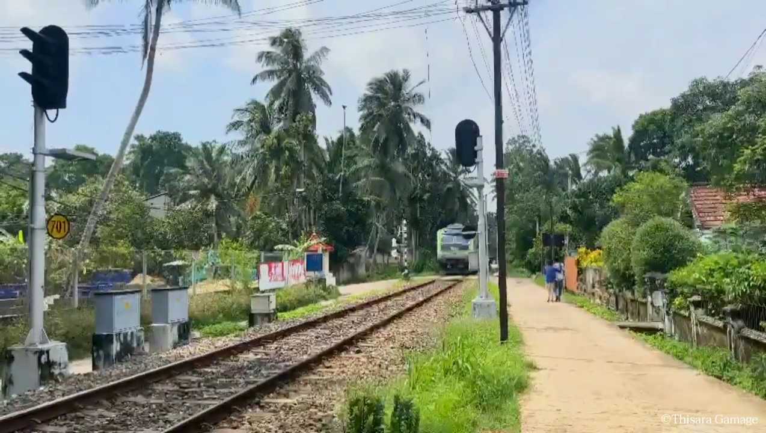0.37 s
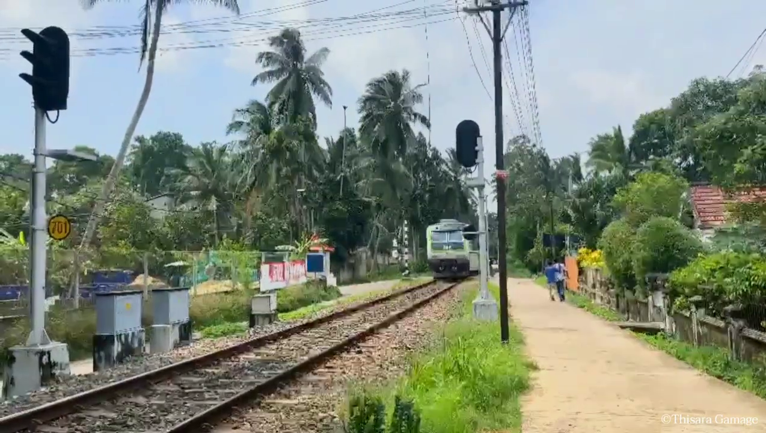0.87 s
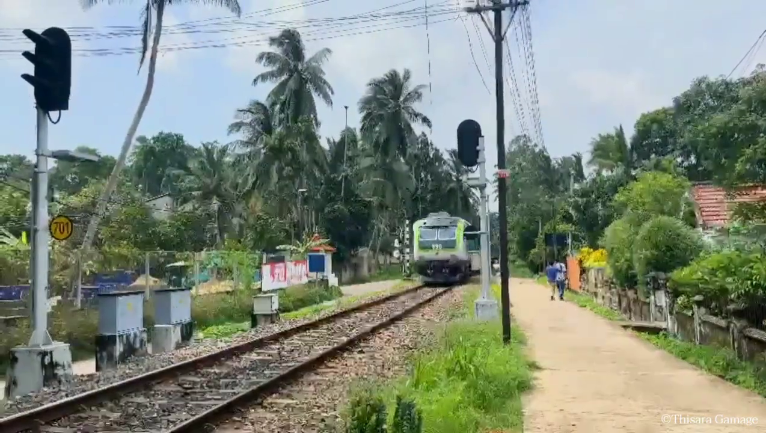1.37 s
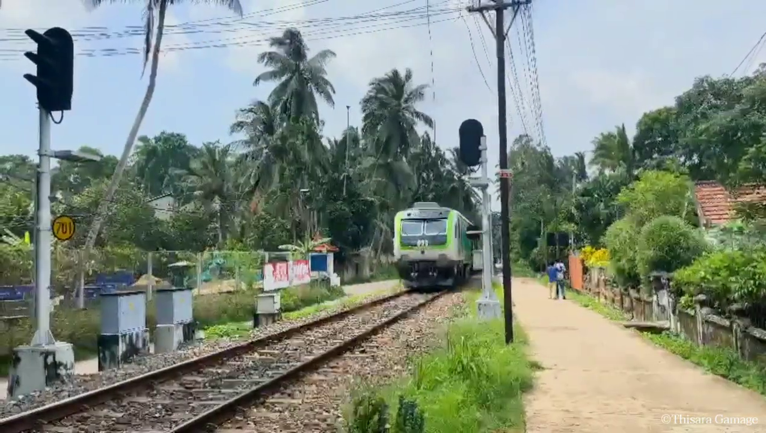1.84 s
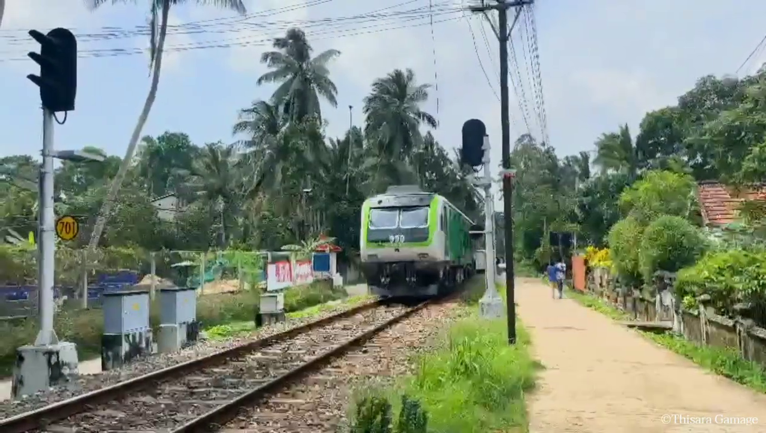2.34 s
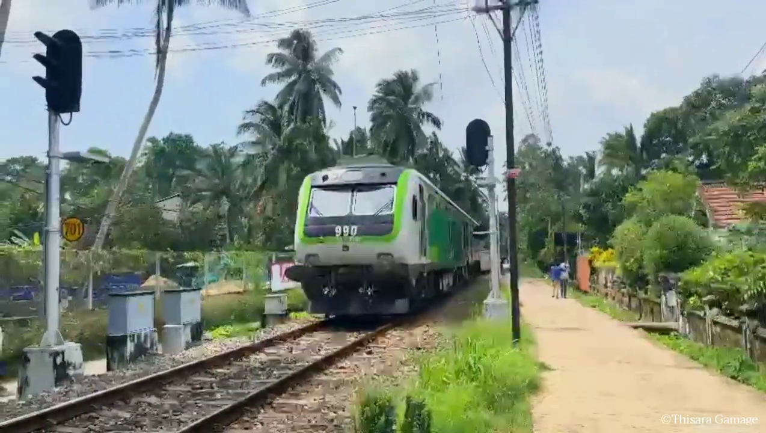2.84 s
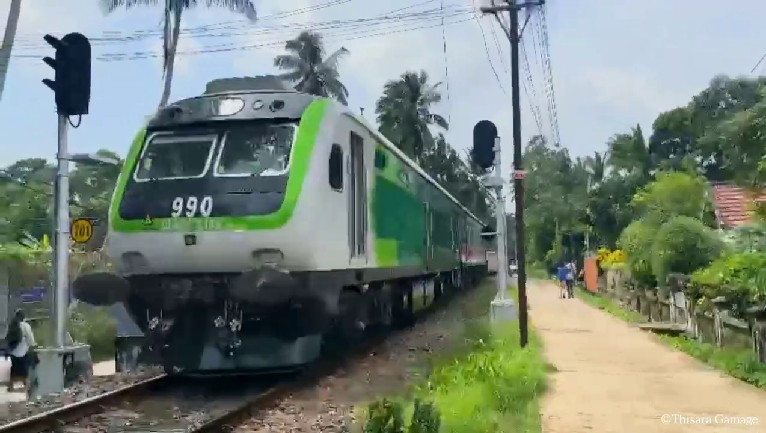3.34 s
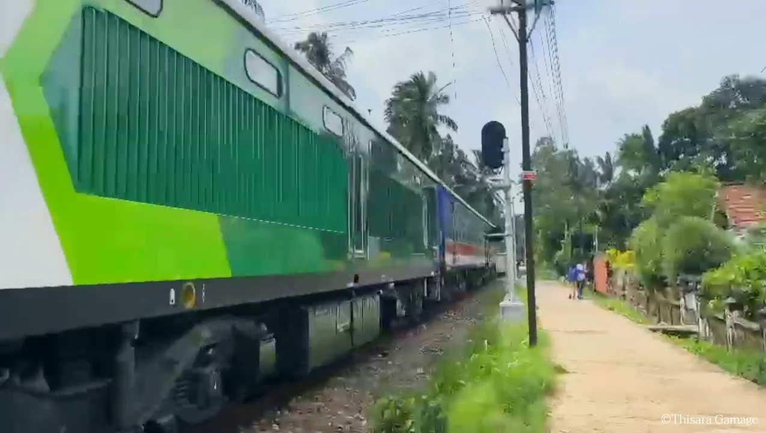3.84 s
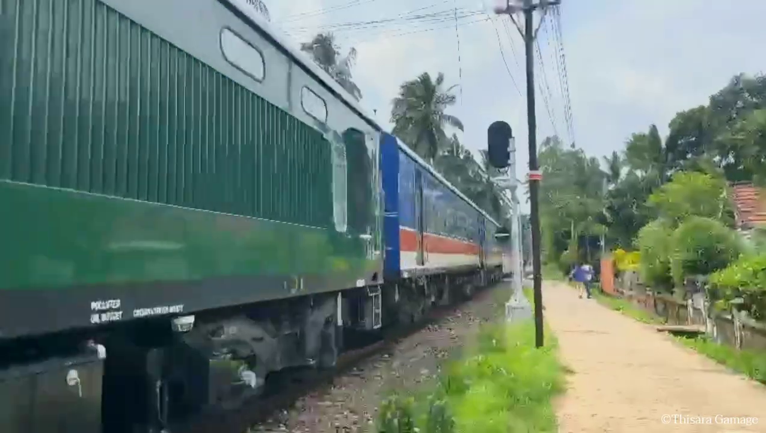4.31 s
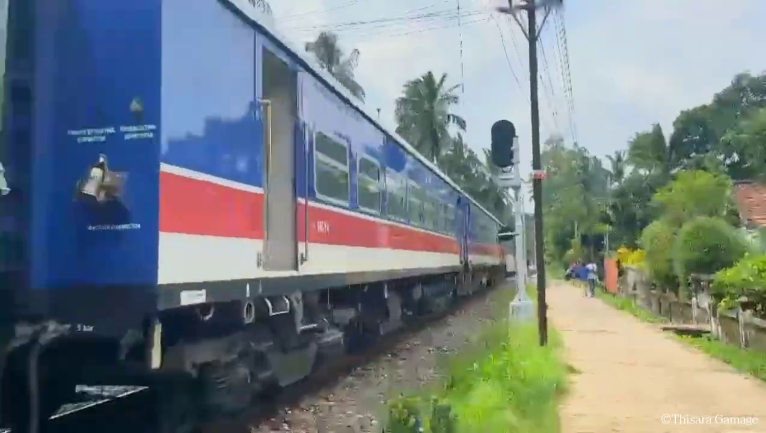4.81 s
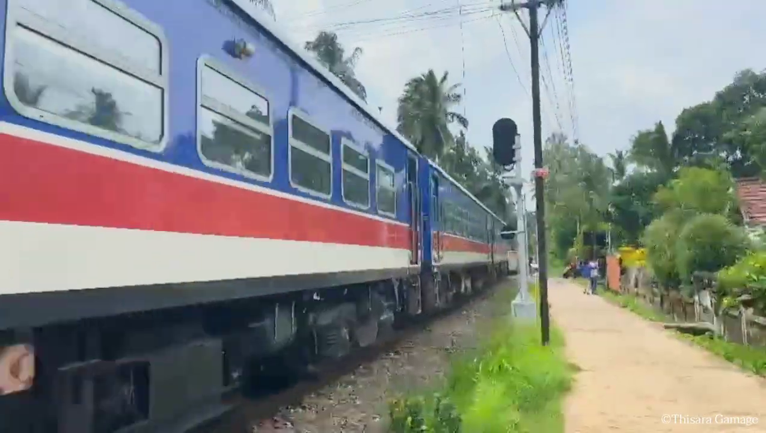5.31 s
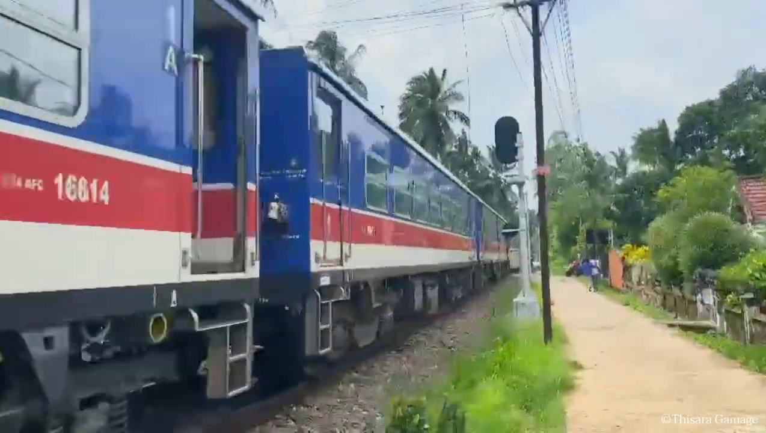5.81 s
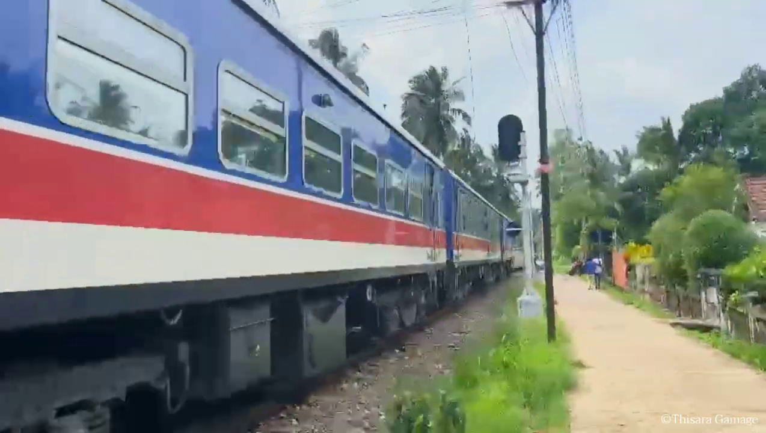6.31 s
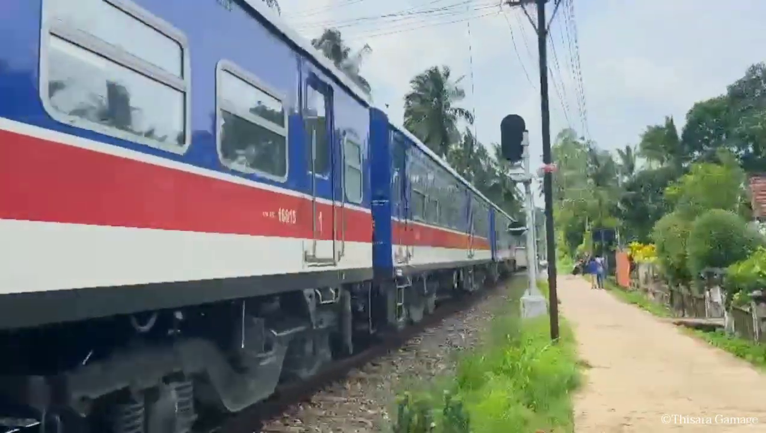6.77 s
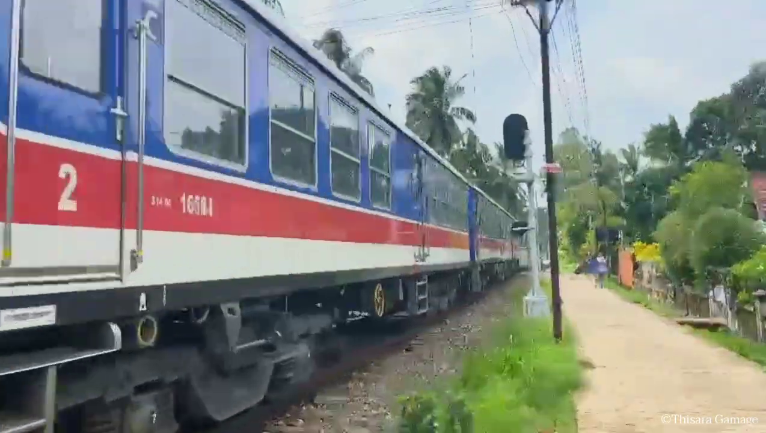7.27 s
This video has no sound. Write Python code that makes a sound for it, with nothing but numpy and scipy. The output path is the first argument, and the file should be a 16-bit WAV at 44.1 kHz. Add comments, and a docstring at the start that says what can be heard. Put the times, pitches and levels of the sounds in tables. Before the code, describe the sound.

Outdoors beside a railway, a diesel locomotive approaches with a low throbbing hum and growing breathy roar. Around three seconds its wheels hit the near rail with hard knocks and steel clatter. The roar peaks close by, a fuzzy whir sliding down in pitch, then falls away while coaches roll past with rumble, hiss and regular paired knocks. Stereo microphone a few metres from the track.

```python
"""Trackside, a few metres from the rails: a diesel train comes up the line, passes, and its coaches roll by.
Sine tones make the engine's firing orders, a second hum and a drone; shaped noise makes the roar, whose
bands drop in pitch as it passes, the rumble and hiss of the wheels and a fuzzy whir.
Wheels knock over the rail joints as noise through resonances, the track bed thuds and loose parts clatter.
Faint thumps and a thin whistle lie behind; a two-port microphone hears it all."""
import sys
import numpy as np
from scipy import signal
from scipy.fft import rfft, irfft
from scipy.io import wavfile
from scipy.ndimage import uniform_filter1d, minimum_filter1d

SR = 44100
rng = np.random.default_rng(int(sys.argv[2]) if len(sys.argv) > 2 else 0)


def transcribe(signal):
    """Save signal, clipped to [-1, 1], as a 16-bit WAV file at the path in sys.argv[1]."""
    frames = np.atleast_2d(signal).T
    limited = np.clip(frames, -1, 1)
    pcm = np.round(limited * 32767).astype(np.int16)
    wavfile.write(sys.argv[1], SR, pcm)


def linear_from_db(decibels):
    """Turn decibels (scalar or array-like) into linear amplitude factors; 0 gives 1."""
    return 10 ** (np.asarray(decibels, float) / 20)


N = 326340

SPEED_M_S, TRACK_M, SOUND_M_S = 12.6, 4.63, 343
ENGINE_S, ROAR_S = 4.44, 4.233  # the exhaust and the engine room are abreast


def evened(x):
    """Scales to rms 1."""
    return x / np.sqrt(np.mean(x ** 2) + 1e-20)


def smooth_noise(shape, size):
    """Random values averaged along the first axis, rms 1."""
    return evened(uniform_filter1d(rng.standard_normal(shape), size=size, axis=0))


def curves(rows, t):
    """Columns of a table read at the times t."""
    s, *columns = np.transpose(rows)
    return [np.interp(t, s, c) for c in columns]


def read(points, hz):
    """A spectrum read on a log-frequency axis."""
    f, value = np.transpose(points)
    return np.interp(np.log(hz + 1), np.log(f + 1), value)


def bump(hz, centre, width):
    """A rounded peak of height 1 that halves at one width from its centre."""
    return 1 / (1 + ((hz - centre) / width) ** 2)


def waver(hz):
    """Irregular drift of rms 1: twelve sines of random phase, the fastest at hz."""
    t = np.arange(N) / SR
    rates = np.geomspace(hz / 10, hz, num=12)
    return evened(sum(np.sin(2 * np.pi * (f * t + rng.random())) / np.sqrt(f) for f in rates))


def tone(hz, db, wobble_hz, flutter_db):
    """A sine of rms level db with slight unsteadiness."""
    turns = np.cumsum(hz + wobble_hz * waver(6.9)) / SR + rng.random()
    return np.sqrt(2) * linear_from_db(db + flutter_db * waver(12)) * np.sin(2 * np.pi * turns)


def ring(x, modes):
    """Sum of resonances, each applied twice for dark valleys."""
    hz = np.fft.rfftfreq(x.shape[-1], 1 / SR)
    gain = sum(linear_from_db(db) / (1 + 1j * (hz - f) / width) ** 2 for f, width, db in modes)
    return irfft(rfft(x) * gain, x.shape[-1])


def burst(t, rise, length):
    """Quick rise, short plateau, rounded end."""
    return (1 - np.exp(-t / rise)) * np.exp(-(t / max(length, .01)) ** 2)


def struck(sound, envelope):
    """Shapes a ringing noise by an envelope, with just the energy that the envelope holds."""
    return evened(sound * envelope) * np.sqrt(np.mean(envelope ** 2))


def add(mix, s, sound):
    """Mixes a two-port sound in at time s."""
    part = mix[:, round(s * SR):][:, :sound.shape[1]]
    part += sound[:, :part.shape[1]]


def doppler(t, abreast_s):
    """Pitch factor of a source on the train: high as it comes, low as it goes."""
    along = SPEED_M_S * (abreast_s - t)
    return 1 / (1 - SPEED_M_S / SOUND_M_S * along / np.hypot(along, TRACK_M))


def nearness(t, abreast_s, closest_m):
    """Power against the closest point, by the inverse square of distance."""
    return 1 / (1 + (SPEED_M_S * (t - abreast_s) / closest_m) ** 2)


def shape(db, hz, low_hz, high_hz):
    """Spectrum whose band low-high carries power 1."""
    gain = linear_from_db(db)
    band = (hz > low_hz) & (hz < high_hz)
    return gain / np.sqrt((gain ** 2 * band).sum(axis=0))


# direction of the loudest part: t/s, lag of the left port/samples,
# how closely the sound gathers there (factor on the likeness above 400 Hz)
LAG = [(0, 3.5, 0.48), (1.3, 2.5, 0.65), (1.9, 10.5, 1.6), (2.7, 15.5, 1.1), (2.97, 13, 1),
       (3.07, -10, 0.99), (3.4, -12.5, 1), (3.7, -9, 1.1), (3.95, -8.5, 1.25), (4.3, -14, 1.57),
       (4.6, -17.5, 1.38), (5.2, -17, 0.59), (5.6, -17.5, 0.93), (6.3, -16, 0.57), (6.7, -16.5, 1.35),
       (7.4, -15, 1.34)]
# likeness of the ports: f/Hz, left-right likeness (negative = opposed)
LIKENESS = [(60, 1), (130, 0.85), (300, 0.7), (500, 0.29), (800, 0.36), (1100, 0.5), (1450, 0.59),
            (2000, 0.26), (2500, 0.0032), (3100, 0.081), (5900, -0.074), (6500, -0.31), (7100, 0.049),
            (7800, -0.061), (8600, 0.43), (10600, 0.54), (11000, -0.67), (11400, 0.044)]
# balance of the ports: f/Hz, left over right/dB
TILT = [(60, -2), (140, -1), (340, -1.5), (830, 1), (1980, 0.5), (4200, 4.5), (5800, 4), (6500, 0.5),
        (7200, 5), (9000, -1), (11400, 0)]
# the casing stretches the lag: f/Hz, share of the lag
BEND = [(340, 0.89), (520, 1.12), (700, 1.1), (900, 1.05), (1400, 0.97), (1800, 0.85), (2100, 1.02),
        (2500, 1.13)]
LAG_TOP_HZ = 3100  # above this the lag is not applied


def ports(magnitude, size, patchy_db):
    """Random short-time spectra at two ports: partly alike, the left one lagging by the direction of the train."""
    t = np.arange(N * 4 // size + 5) * size / 4 / SR
    hz = np.fft.rfftfreq(size, 1 / SR)[:, None]
    a, b, c, d, patches = rng.standard_normal((len(t), len(hz), 5)).T
    patches = evened(uniform_filter1d(uniform_filter1d(patches, size=9, axis=0), size=9, axis=1))
    lag, gathering = curves(LAG, t)
    same = np.clip(read(LIKENESS, hz) * gathering ** (hz > 400), -.97, .995)
    right, own = a + 1j * b, c + 1j * d
    delay_s = read(BEND, hz) * lag / SR * (hz < LAG_TOP_HZ)
    left = same * right * np.exp(-2j * np.pi * hz * delay_s) + np.sqrt(1 - same ** 2) * own
    side = linear_from_db(read(TILT, hz) / 2)
    z = np.array([left * side, right / side]) * magnitude(t, hz) * linear_from_db(patchy_db * patches)
    return signal.istft(z * np.sqrt(3), nperseg=size, noverlap=size * 3 // 4)[1][:, :N]


def shaken(s, size):
    """Noise at both ports, part of it shared from the direction of the train at time s."""
    own, shared = rng.standard_normal((2, 2, size))
    lagged = np.roll(shared[0], round(curves(LAG, s)[0]))
    return 0.7 * own + 0.65 * np.array([lagged, shared[0]])


# hollow thumps far up the line: t/s, level/dB, length/s, f/Hz
THUMPS = [(0.862, -16.5, 0.066, 303.6), (1.782, -18.5, 0.028, 375)]
# notes of each thump: multiple of f, level against the thump/dB
THUMP = [(.535, -5), (1.001, -0.5), (1.95, -13.5)]


def thumps():
    """Hollow thumps, each a short cluster of sines, equal at both ports."""
    t, out = np.arange(SR // 4) / SR, np.zeros((2, N))
    for s, db, length, hz in THUMPS:
        notes = sum(linear_from_db(db + m) * np.sin(2 * np.pi * (k * hz * t + rng.random())) for k, m in THUMP)
        add(out, s, notes * burst(t, 0.013, length) * np.ones((2, 1)))
    return out


# a faint thin whistle: t/s, f/Hz, level before port balance/dB
WHISTLE = [(.28, 2148, -46), (.46, 2148, -46), (.52, 2148, -53), (.6, 2148, -50), (.7, 2148, -54)]


def whistle():
    """A thin, nearly steady sine, soft at both ends and stronger at the left port."""
    t = np.arange(N) / SR
    hz, db = curves(WHISTLE, t)
    on = uniform_filter1d(1. * (t > WHISTLE[0][0]) * (t < WHISTLE[-1][0]), size=1500)
    return tone(hz, db, 1.5, 1.) * on * np.array([[1.5], [.5]])


DRONE_HZ, DRONE_DB, DRONE_S, DRONE_M = 157.3, -35, 6.7, 6.8  # pitch; level, time and distance abreast


def drone():
    """An unsteady drone under a passing coach, swelling by distance and sliding down in pitch."""
    t = np.arange(N) / SR
    db = DRONE_DB + 10 * np.log10(nearness(t, DRONE_S, DRONE_M))
    return tone(DRONE_HZ * doppler(t, DRONE_S), db, 2.0, 3.8)


# noisy running gear going by: t abreast/s, roar level/dB, rumble level/dB, hiss level/dB,
# hiss brightness/dB per octave (levels before the changes made by each noise)
BOGIES = [(.95, -33, -27, -50.5, 1), (1.8, -33, -28, -51, -1), (2.5, -27, -23.5, -72, 6),
          (3.15, -25, -19.5, -41.5, 1), (4.2, -23, -19, -34, -1.5), (5.5, -32, -25, -38.5, 3.5),
          (6.8, -33, -26, -41.5, 1.5), (7.9, -28.5, -23, -39.5, -7)]
WHEEL_M = 3.05  # distance from the passing wheels


def running_gear(t):
    """Powers of roar, rumble and hiss summed over the bogies, and hiss brightness weighted by their hiss power."""
    s, roar_db, rumble_db, hiss_db, bright_db = np.transpose(BOGIES)
    near = nearness(t[:, None], s, WHEEL_M)
    powers = [near @ linear_from_db(2 * db) for db in (roar_db, rumble_db, hiss_db)]
    return (*powers, near @ (linear_from_db(2 * hiss_db) * bright_db) / powers[2])


# colour of the hiss: f/Hz, relative level/dB
HISS = [(900, -17), (1500, -13.5), (2400, -3), (2900, -4.5), (3700, -4.5), (4100, -9.5), (4500, -7.5),
        (6200, -11), (6700, -17), (7300, -17.5), (10200, -27), (10900, -27), (11800, -12)]
# steady fuzzy bands of fixed pitch in the hiss: f/Hz, half-width/Hz, boost/dB
FUZZY_BANDS = [(2330, 93, 8.5), (4102, 44, 13)]


def hiss(t, hz):
    """Fine roughness of wheel on rail; brightness follows the bogies, and the whole treble flickers."""
    *_, power, bright_db = running_gear(t)
    flicker_db = 0.46 * smooth_noise(len(t), 12)
    bands_db = sum(db * bump(hz, f, width) for f, width, db in FUZZY_BANDS)
    colour_db = read(HISS, hz) + bright_db * np.log2(1 + hz / 5000) + bands_db
    return shape(colour_db, hz, 3500, 10000) * np.sqrt(power) * linear_from_db(flicker_db)


# colour of the rumble: f/Hz, relative level/dB
RUMBLE = [(20, -23), (40, 5), (70, 17.5), (100, 12.5), (128, 7), (165, 3), (200, 1.5), (330, -6.5),
          (600, -15), (1200, -25.5), (2500, -48.5)]
# the deepest rumble: its upper edge, level against the rest when that is at -30.5 dB,
# share of the level changes that it misses, unsteadiness
DEEP_HZ, DEEP_DB, DEEP_SHARE, DEEP_WAVER_DB = 138.3, -9, 0.77, 1.5
GONE_DB = -3.5  # it thins by this much once the engine has gone
NOSE_S, NOSE_RISE_S, SHADOW_DB = 3, 0.034, -9.5  # fainter until the front wheels reach the near rail
# the heavy locomotive sets the ground booming: time and distance abreast, pitch, half-width, boost
HEAVY_S, HEAVY_M, HEAVY_HZ, HEAVY_WIDTH_HZ, HEAVY_DB = 3.9, 4.2, 126, 27, 4.5


def rumble(t, hz):
    """Low rolling noise of rails and sleepers; its deepest part carries far and grows less as wheels come close."""
    shadow_db = SHADOW_DB / (1 + np.exp((t - NOSE_S) / NOSE_RISE_S))
    level_db = 10 * np.log10(running_gear(t)[1]) + shadow_db
    thinning_db = GONE_DB / (1 + np.exp(2 * (ENGINE_S + 1 - t)))
    lumps_db = DEEP_WAVER_DB * smooth_noise(len(t), 16)
    deep_db = DEEP_DB - DEEP_SHARE * (level_db + 30.5) + lumps_db + thinning_db
    boom_db = HEAVY_DB * nearness(t, HEAVY_S, HEAVY_M) * bump(hz, HEAVY_HZ, HEAVY_WIDTH_HZ)
    return shape(read(RUMBLE, hz), hz, 130, 330) * linear_from_db(level_db + boom_db + deep_db / (1 + (hz / DEEP_HZ) ** 8))


# brake gear: f/Hz, half-width/Hz, relative level/dB
RATTLE = [(4270, 900, -4), (6000, 800, -6), (8400, 3000, -14), (3470, 140, -9.5), (4320, 70, -7),
          (4940, 90, -6), (5670, 80, -7), (5900, 50, -4), (7480, 110, -10), (8310, 70, -10),
          (10200, 90, -19)]
# brake gear clattering after a jolt: t/s, level before the envelope/dB, length/s, brightness/dB per octave
CLATTER = [(0.865, -41, 0.13, -6), (1.064, -63, .05, -9), (3.051, -28, 0.16, -6.5), (3.24, -27.5, 0.11, -6),
           (3.402, -30, 0.15, -5), (3.921, -29, 0.072, -5), (4.122, -37, 0.043, 16), (4.4, -29, 0.11, -6),
           (4.582, -35, 0.087, 1), (5.09, -43, 0.047, 1), (5.279, -44, 0.089, 4), (5.57, -37, 0.12, 9),
           (5.765, -37, 0.078, -8), (6.27, -35.5, 0.13, -5), (6.453, -36, 0.1, -18),
           (6.755, -45, 0.073, 15), (6.94, -37, 0.052, -14)]
PART_SPREAD = .03  # each jolt finds other loose parts, their pitch scattered by this share
CHATTER_DB = 3  # the parts knock together in uneven beats of some 8 ms


def clatter():
    """Loose steel parts ring; each jolt wakes the modes unevenly."""
    t, out = np.arange(SR // 3) / SR, np.zeros((2, N))
    for s, db, length, bright_db in CLATTER:
        uneven, other = rng.standard_normal((2, len(RATTLE)))
        modes = [(hz * (1 + PART_SPREAD * o), width, m + 2.5 * u + bright_db * np.log2(hz / 5500))
                 for (hz, width, m), u, o in zip(RATTLE, uneven, other)]
        beats = linear_from_db(CHATTER_DB * smooth_noise(len(t), 350))
        ringing = evened(ring(shaken(s, len(t)) * beats, modes))
        add(out, s, linear_from_db(db) * ringing * burst(t, 0.0031, length))
    return out


# wheels over joints: t/s, relative knock level/dB, relative thud level against knock/dB, length/s,
# pitch of the rail against its usual ring
JOINTS = [(0.863, -19, 5, 0.058, 0.84), (1.770, -16, -4, 0.053, 1.04), (2.54, -32, -2, 0.033, 0.83),
          (3.029, -9.5, 15, 0.029, 0.85), (3.085, -8, -14, 0.08, 1.01), (3.219, -4, 0, 0.042, 1.07),
          (3.399, -4.5, -1, 0.079, 0.97), (3.901, -6.5, 11, 0.021, 0.94), (3.932, -7, 5, 0.056, 1.15),
          (4.105, -20, 12, 0.078, 0.67), (4.407, -12, -3, 0.12, 1.34), (4.592, -10.5, -10, 0.037, 0.98),
          (5.09, -11.5, 1, 0.059, 0.94), (5.268, -10.5, 3, 0.045, 0.906), (5.574, -9, -19, 0.038, 0.9),
          (5.753, -14, 1, 0.078, 0.94), (6.263, -12, 4, 0.064, 1.01), (6.445, -11, 5, 0.048, 0.92),
          (6.745, -15.5, -7, 0.087, 0.93), (6.92, -17, -5, 0.098, 0.88)]
# rail and sleeper: f/Hz, half-width/Hz, relative level/dB
KNOCK = [(330, 37, -6.5), (464, 184, 0.5), (665, 128, 6.5), (744, 85, -1.5), (852, 63, 4.5),
         (1046, 110, -1), (1326, 91, -6), (1830, 340, -6.5), (2424, 145, -9.5)]
# track bed: f/Hz, half-width/Hz, relative level/dB
THUD = [(115, 23, 0.5), (158.6, 22, 1), (212, 23, -1), (306, 54, -8.5), (394, 43, -8.5), (514, 77, -8.5)]
BLOW, BLOW_S, UNEVEN_DB = 1.0, .008, 1.5  # first blow: extra strength, decay; how unevenly it wakes the modes
BOUNCE, BOUNCE_HZ = .45, 38  # the rail end rebounds, so each knock comes in beats (rate at usual pitch)
# the wheel's first contact rings the rail freely: relative level, share of the mode widths
STRIKE_DB, STRIKE_NARROW = -2, 0.28
# each note of the bed arrives after this many of its own cycles; its length against the knock
THUD_TURNS, THUD_LENGTH = 5.17, 0.9


def joints():
    """Each wheel strikes and shakes the rail for a moment; the track bed answers a little later, deepest notes last."""
    t, out = np.arange(SR // 4) / SR, np.zeros((2, N))
    for s, db, thud_db, length, pitch in JOINTS:
        uneven = rng.standard_normal(len(KNOCK))
        shake = shaken(s, len(t))
        modes = [(hz * pitch, width, m + UNEVEN_DB * u) for (hz, width, m), u in zip(KNOCK, uneven)]
        blow = 1 + BLOW * np.exp(-t / BLOW_S)
        bounce = 1 + BOUNCE * np.cos(2 * np.pi * BOUNCE_HZ * pitch * t)
        envelope = burst(t, 0.0037, length) * blow * bounce
        # one click at each port, the left one shifted by the lag
        click_at = 30 + np.array([[round(curves(LAG, s)[0])], [0]])
        contact = 1. * (np.arange(len(t)) == click_at)
        strike = ring(contact, [(hz, STRIKE_NARROW * width, m) for hz, width, m in modes])
        knock = struck(ring(shake, modes), envelope) + 2 * linear_from_db(STRIKE_DB) * strike / abs(strike).max()
        thud = 0
        for hz, width, m in THUD:
            late = np.maximum(t - THUD_TURNS / hz, 0)
            note = ring(shake[1], [(hz, width, 0)])
            thud = thud + linear_from_db(m) * struck(note, burst(late, 0.012, THUD_LENGTH * length))
        add(out, s, linear_from_db(db - 9.5) * (knock + linear_from_db(thud_db - 4) * thud))
    return out


# a fuzzy machine whir: t/s, level/dB
WHIR = [(0, -54.5), (1.6, -50.5), (2.4, -47), (2.9, -36), (3.3, -46), (3.6, -32), (4.2, -27.5),
        (4.7, -40.5), (5.2, -49), (6, -50), (7.4, -53)]
WHIR_HZ, WHIR_WIDTH_HZ = 1878, 28  # pitch on board; bandwidth of each of two filter poles


def whir():
    """A narrow band of noise from a fast rotor, sliding down as the engine passes, independent at the two ports."""
    t = np.arange(N) / SR
    r = np.exp(-np.pi * WHIR_WIDTH_HZ / SR)
    noise = rng.standard_normal((2, N)) + 1j * rng.standard_normal((2, N))
    slow = signal.lfilter([1], [1, -2 * r, r * r], noise)
    turns = np.cumsum(WHIR_HZ * doppler(t, ROAR_S)) / SR
    return np.sqrt(2) * linear_from_db(curves(WHIR, t)[0]) * evened((slow * np.exp(2j * np.pi * turns)).real)


# colour of the roar: f/Hz, relative level/dB
ROAR = [(150, -67), (250, -1.5), (310, -1.5), (430, -5.5), (520, -4.5), (678, 2), (1130, -8), (1380, -9),
        (1470, -9.5), (1930, -15.5), (2090, -22.5), (4000, -19), (5200, -87), (8800, -120)]
# bands of the roar, approaching: f/Hz, half-width/Hz, boost/dB
ROAR_BANDS = [(401, 15, 9), (695, 180, 6.5), (1242, 240, 17), (1947, 227, 18), (2270, 140, 17)]
ROAR_DB, ROAR_M = -14.5, 2.13  # level before the running gear joins, and distance, when abreast
# roar tilt per octave: from afar, added close by, added each second once the engine has gone
COMING_TILT_DB, NEAR_TILT_DB, BRIGHTENING_DB_S = -3, 1.5, 1.5
BANDS_FADE_S = 5.3  # time constant of the bands flattening out once the engine has gone
BAND_WAVER_DB, BAND_WAVER = 1.1, .006  # each band swells and drifts in pitch (share) on its own


def roar(t, hz):
    """Exhaust, fan and running gear noise; its bands slide down in pitch as the engine passes."""
    near = nearness(t, ROAR_S, ROAR_M)
    gain = np.sqrt(linear_from_db(2 * ROAR_DB) * near + running_gear(t)[0])
    gone_s = np.maximum(t - ENGINE_S, 0)
    tilt_db = COMING_TILT_DB + NEAR_TILT_DB * np.sqrt(near) + BRIGHTENING_DB_S * gone_s
    slide = doppler(t, ENGINE_S) / doppler(0, ENGINE_S)
    swell, drift = smooth_noise((len(t), 2, len(ROAR_BANDS)), 9).transpose((1, 2, 0))
    bands_db = sum((db + BAND_WAVER_DB * a) * bump(hz, f * slide * (1 + BAND_WAVER * b), width)
                   for (f, width, db), a, b in zip(ROAR_BANDS, swell, drift))
    bands_db = bands_db * np.exp(-gone_s / BANDS_FADE_S)
    # many small machine parts: narrow strands that swell for a sixth of a second and fade
    strands = uniform_filter1d(rng.standard_normal((len(t), len(hz))), size=14, axis=0).T
    strands_db = 2.2 * evened(uniform_filter1d(strands, size=2, axis=0))
    colour_db = read(ROAR, hz) + bands_db + tilt_db * np.log2(1 + hz / 400) + strands_db
    return shape(colour_db, hz, 500, 2600) * gain


# strength of the second hum: t/s, level before port balance/dB
HUM = [(0, -30), (.3, -33), (1.0, -28), (1.3, -26), (2.0, -26), (2.7, -27), (3.35, -33), (3.8, -23.5),
       (4.25, -22.5), (4.5, -34), (4.8, -25.5), (5.75, -25.5), (6.25, -30), (6.5, -36), (6.8, -25),
       (7.4, -27)]
HUM_S, HUM_HZ = 5.9, 75.26  # time abreast; pitch on board


def second_hum():
    """A hum of its own speed, sliding down in pitch as it passes."""
    t = np.arange(N) / SR
    return tone(HUM_HZ * doppler(t, HUM_S), curves(HUM, t)[0], 0.84, 0.63)


# the two engine tones swell and sink on the way: t/s, firing tone level/dB, fourth multiple level/dB
# (before port balance)
ENGINE = [(0, -19, -48), (.12, -23.5, -42), (.4, -20, -37.5), (.7, -26, -33.5), (.9, -21.5, -36.5),
          (1.1, -17.5, -48), (1.25, -21, -39), (1.4, -21, -35), (1.6, -23.5, -34), (1.9, -19.5, -36),
          (2.12, -22, -36), (2.25, -16.5, -25), (2.5, -18.5, -25), (2.8, -17, -22.5), (2.97, -13.5, -29.5),
          (3.1, -12.5, -34), (3.3, -19.5, -27), (3.46, -19.5, -21), (3.62, -16, -32), (3.8, -18, -25.5),
          (3.95, -29, -19), (4.14, -14.5, -17), (4.32, -14.5, -17), (4.5, -17.5, -23.5), (4.7, -21.5, -25),
          (4.95, -24, -34), (5.12, -30, -38), (5.34, -25, -29.5), (5.58, -36, -40), (5.77, -26, -55),
          (6.05, -29, -32), (6.35, -36, -47), (6.62, -43, -56), (7.4, -44, -56)]
# weaker shaft orders: multiple of one sixth of the firing rate, level against the firing tone/dB
SHAFT = [(8, -13), (11, -16)]
FIRING_HZ = 49.94  # settled firing rate on board
SETTLE, SETTLE_S = 0.0089, 0.888  # the engine runs this share fast at first and settles over this time


def engine():
    """Firing tone, its fourth multiple, and uneven cylinders as shaft orders."""
    t = np.arange(N) / SR
    settling = 1 + SETTLE * np.exp(-(t / SETTLE_S) ** 2)
    hz = FIRING_HZ * settling * doppler(t, ENGINE_S)
    first_db, fourth_db = curves(ENGINE, t)
    firing = tone(hz, first_db, 0.099, 1.0) + tone(4 * hz, fourth_db, 0.33, 1.46)
    return firing + sum(tone(k * hz / 6, first_db + db, .8, 2.4) for k, db in SHAFT)


GROWL_DB, GROWL_HZ = 0.68, 45.1  # the roar shudders by this much (rms), up to this rate


def scene():
    """Everything at the trackside."""
    background = thumps() + whistle()
    wheels = ports(hiss, size=512, patchy_db=1.51) + ports(rumble, size=2048, patchy_db=0.44)
    knocks = clatter() + joints()
    growling = ports(roar, size=2048, patchy_db=1.28) * linear_from_db(GROWL_DB * waver(GROWL_HZ))
    hums = (drone() + second_hum() + engine()) * linear_from_db([[-.6], [.55]])  # a little stronger at the right port
    return background + wheels + knocks + whir() + growling + hums


def low_pass(x):
    """Removes everything above the highest recorded frequency."""
    return signal.sosfilt(signal.butter(12, 11750, fs=SR, output="sos"), x)


def record(dry):
    """A peak limiter holds the loudest moments under full scale."""
    room = np.minimum(.93 / (abs(dry).max(axis=0) + 1e-9), 1)
    held = minimum_filter1d(room, size=801)
    finished = dry * uniform_filter1d(held, size=401)
    return low_pass(finished)


dry = scene()
out = record(dry)
transcribe(out)
```